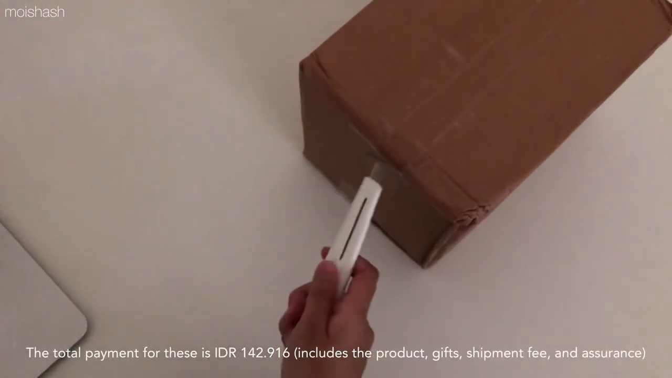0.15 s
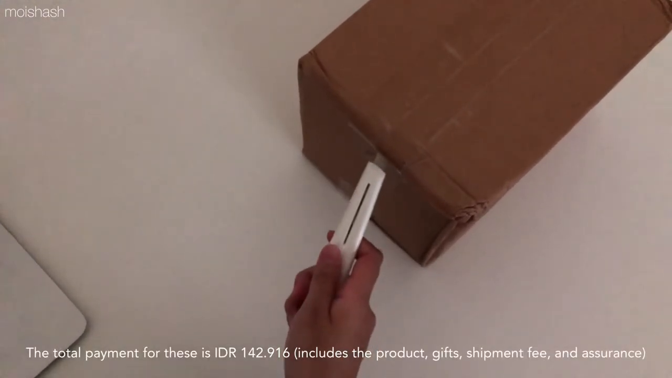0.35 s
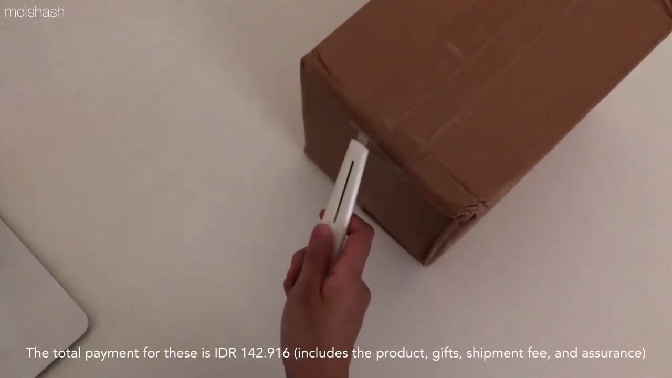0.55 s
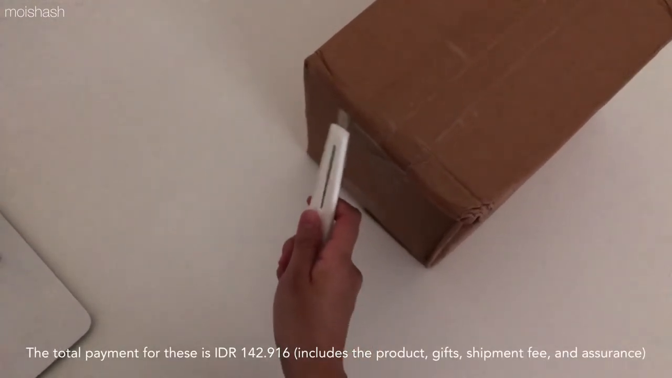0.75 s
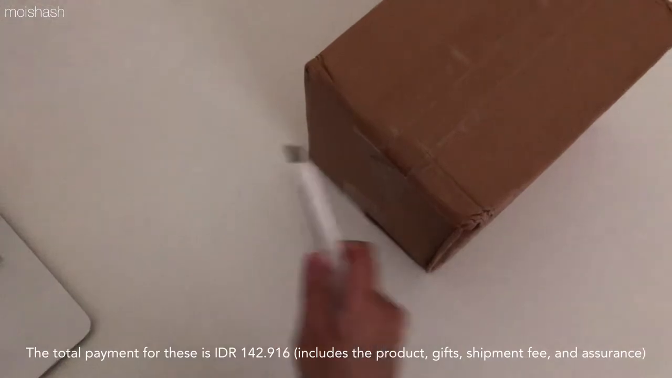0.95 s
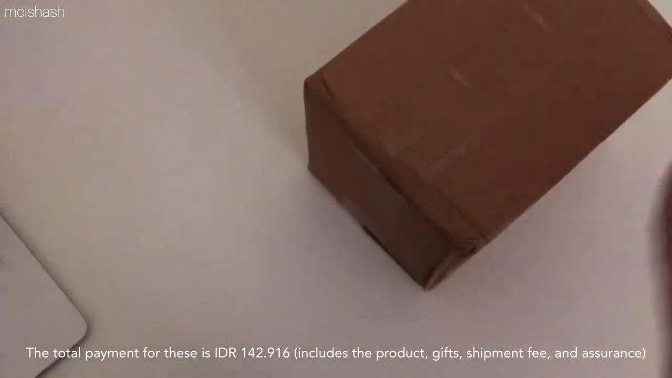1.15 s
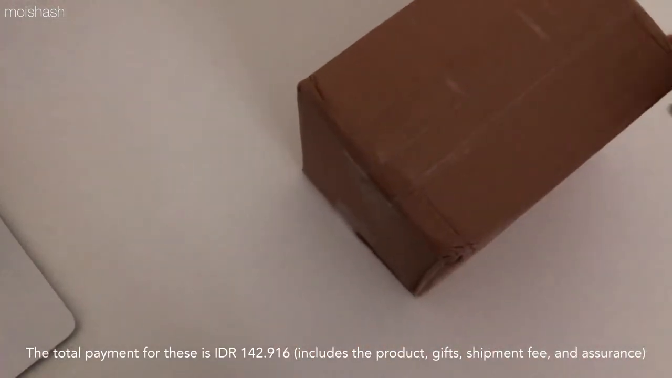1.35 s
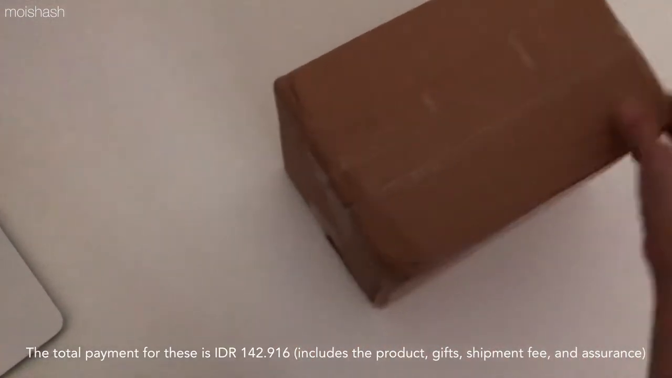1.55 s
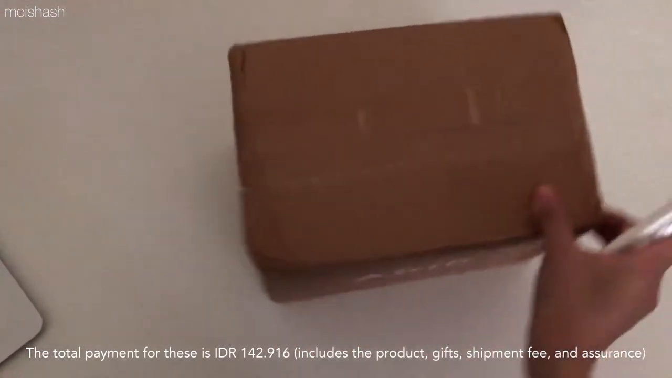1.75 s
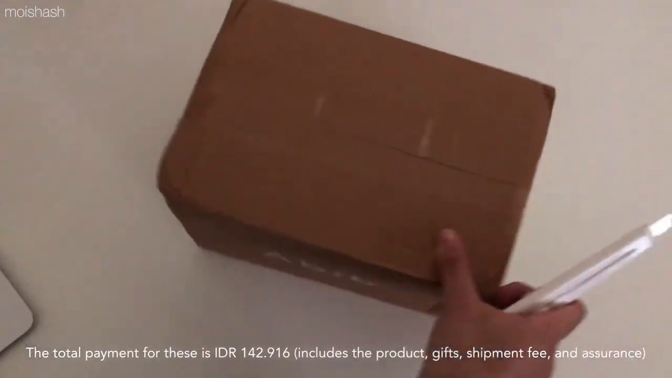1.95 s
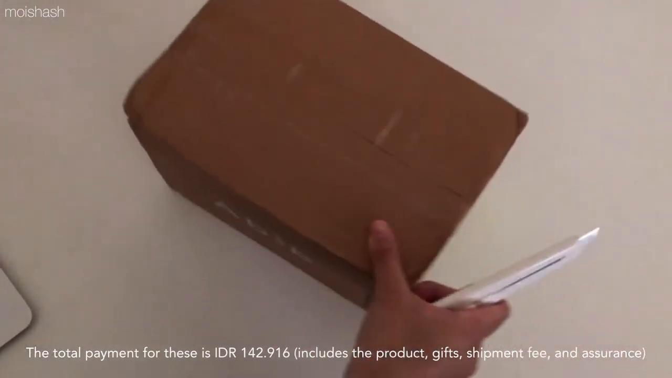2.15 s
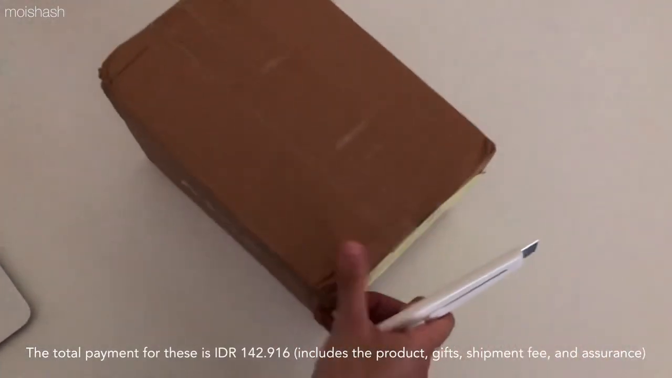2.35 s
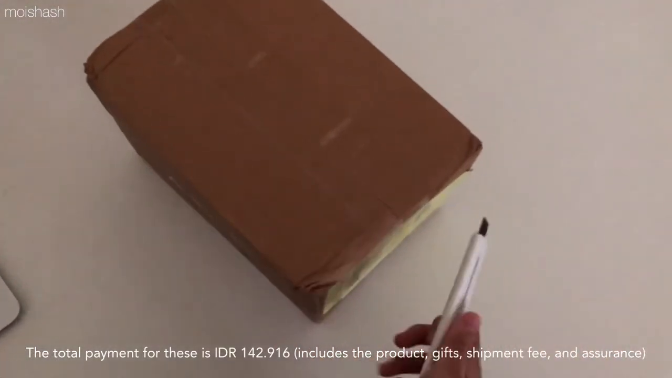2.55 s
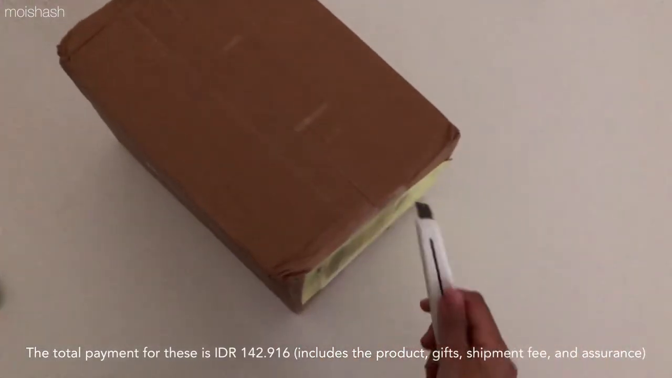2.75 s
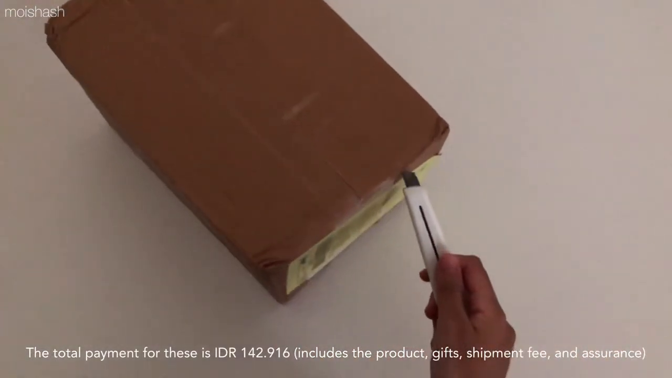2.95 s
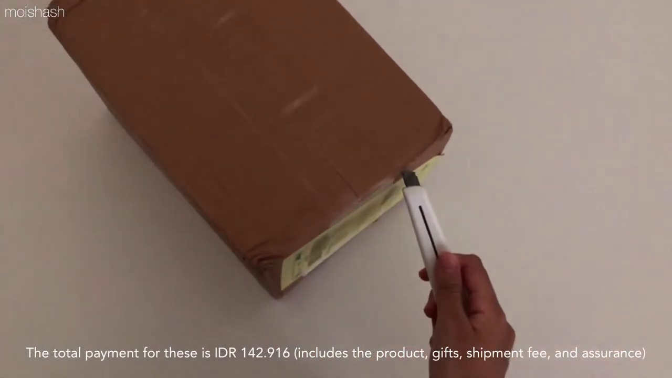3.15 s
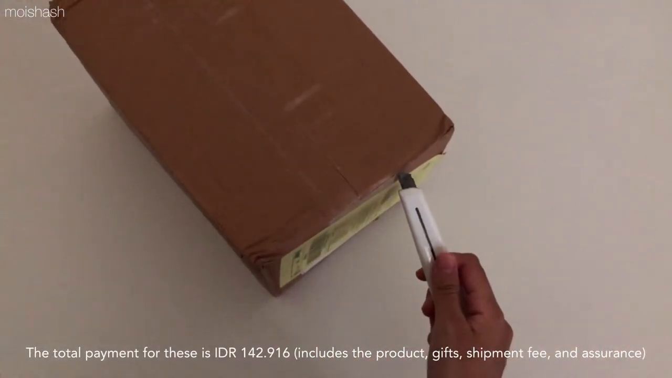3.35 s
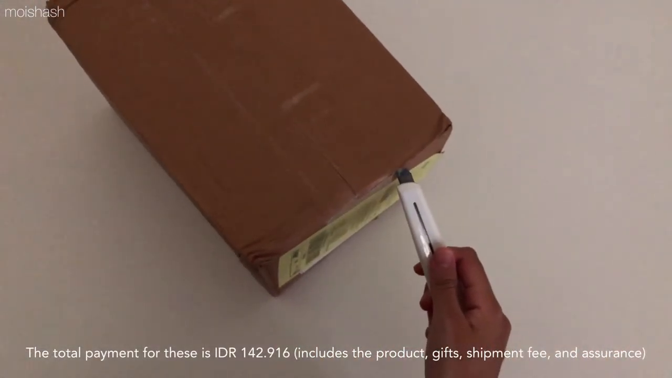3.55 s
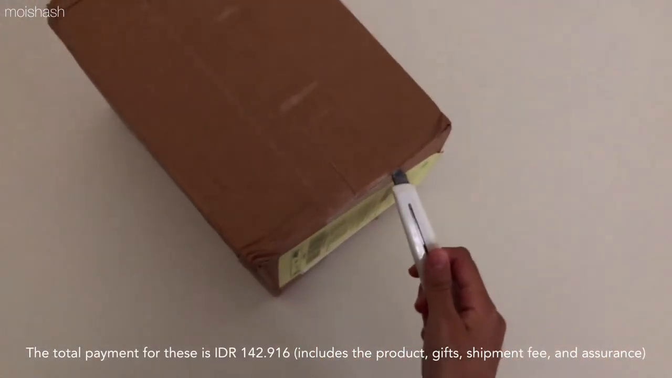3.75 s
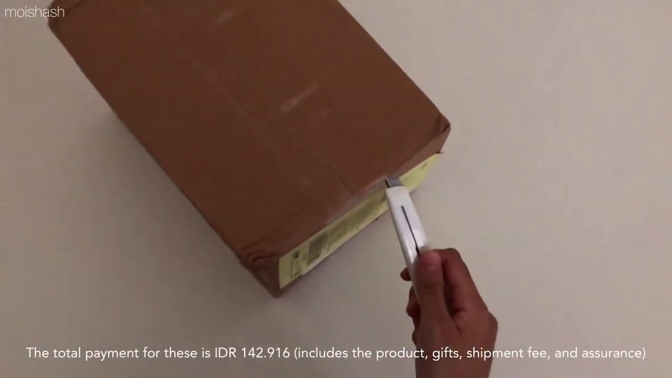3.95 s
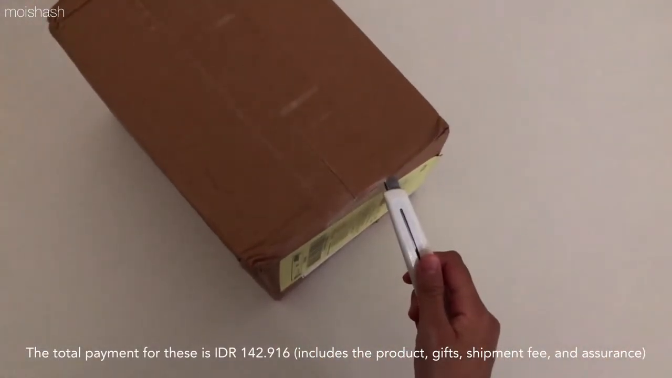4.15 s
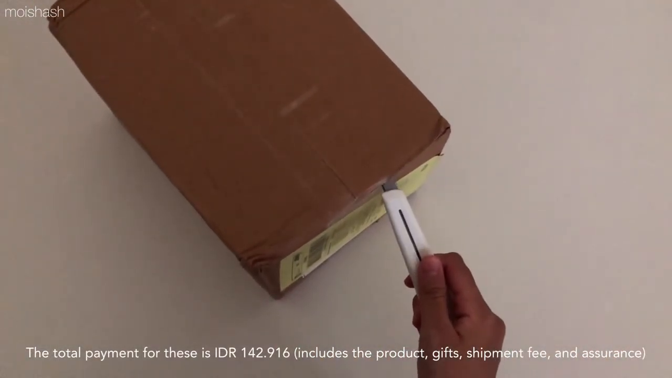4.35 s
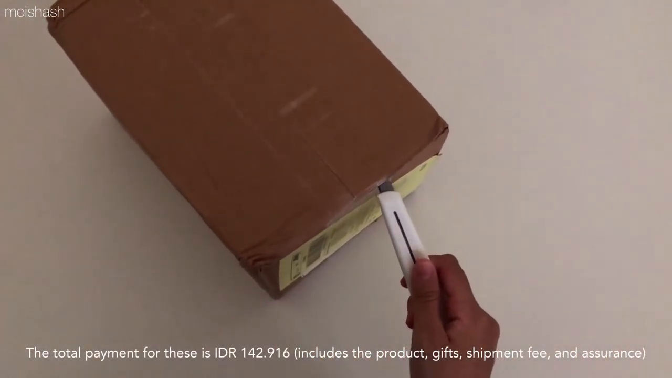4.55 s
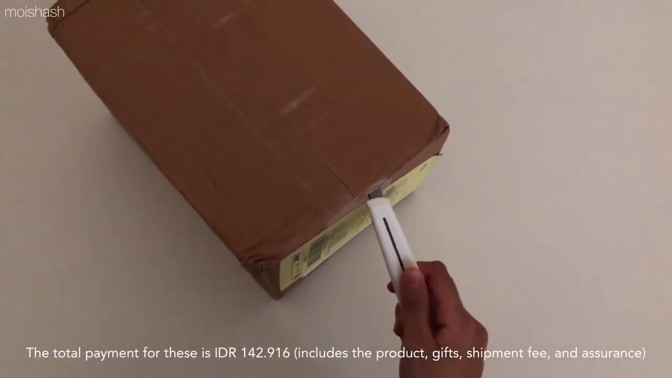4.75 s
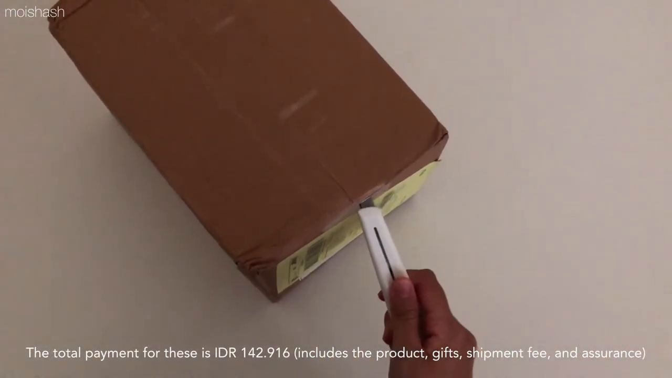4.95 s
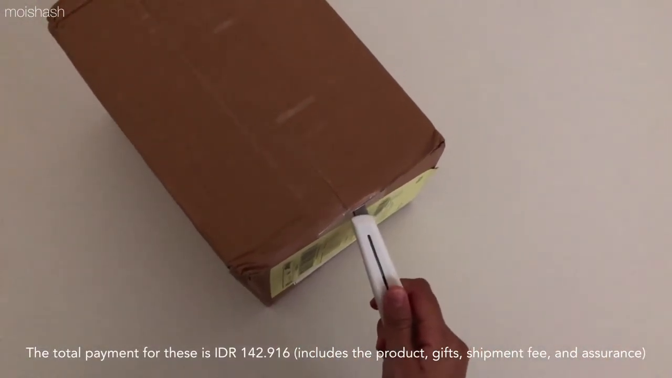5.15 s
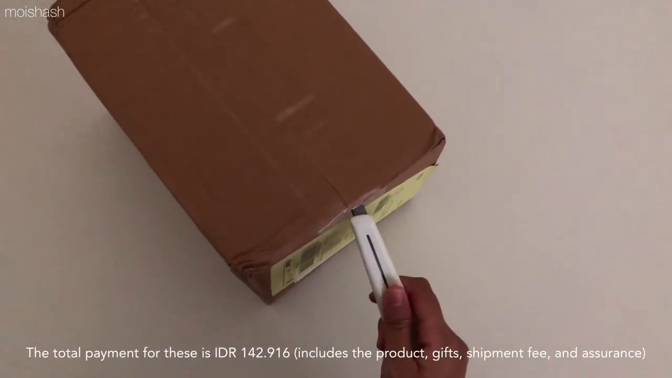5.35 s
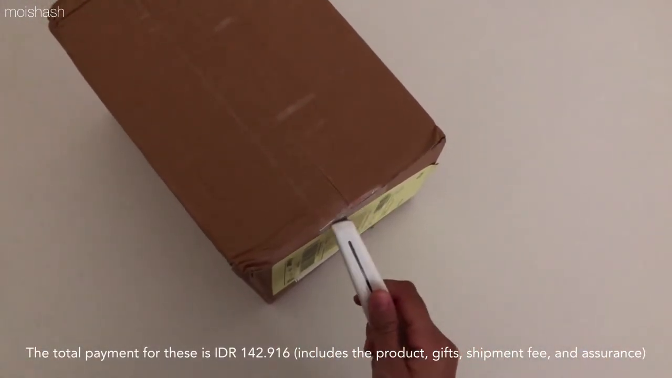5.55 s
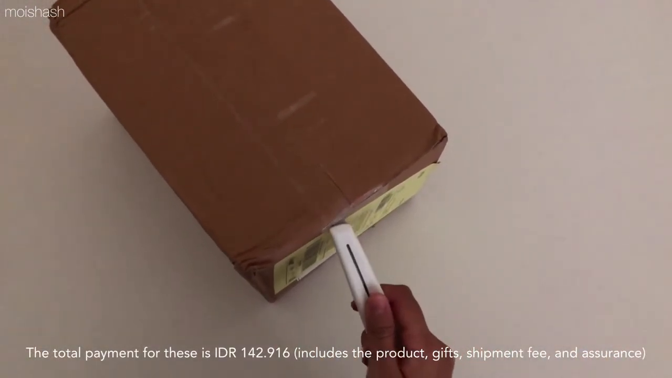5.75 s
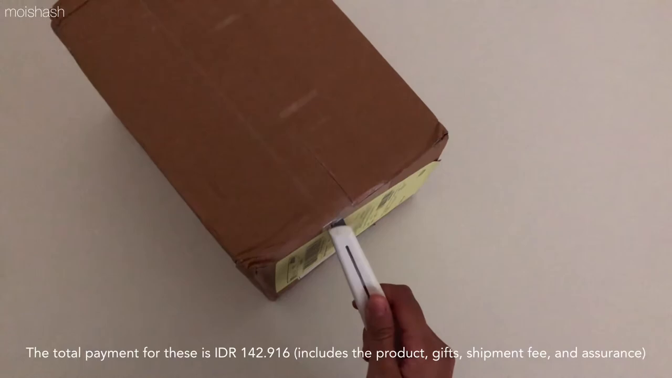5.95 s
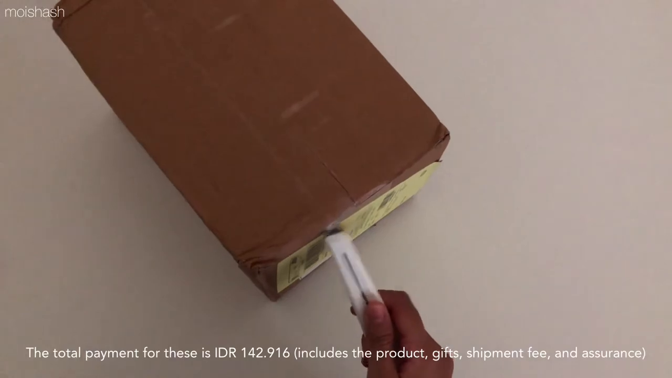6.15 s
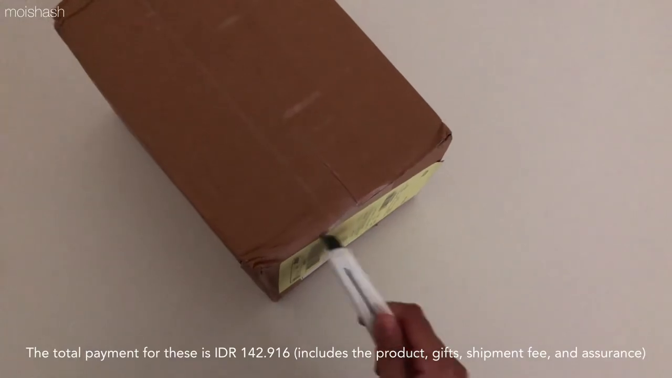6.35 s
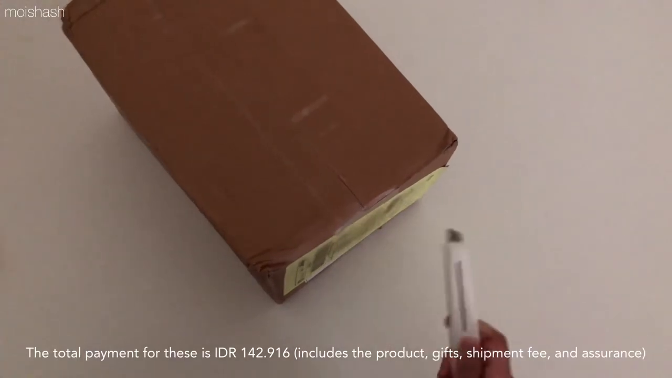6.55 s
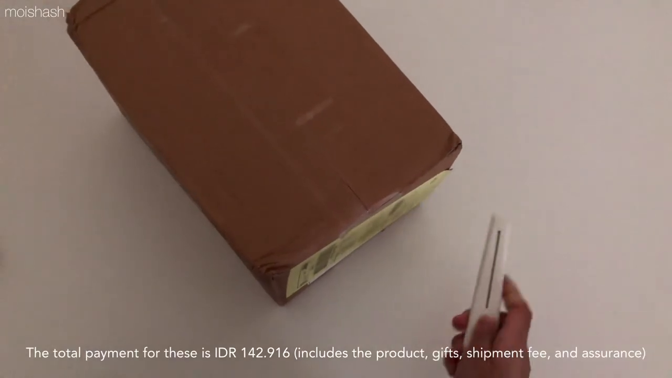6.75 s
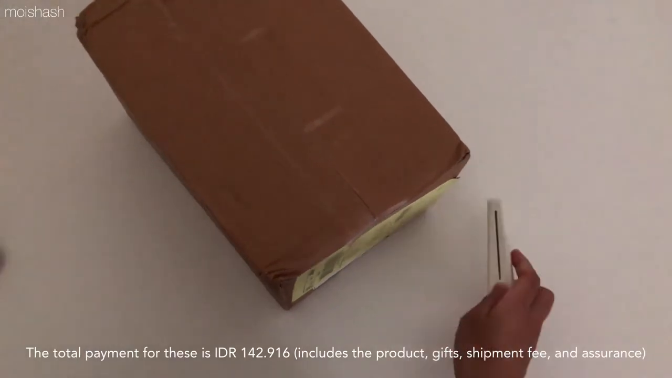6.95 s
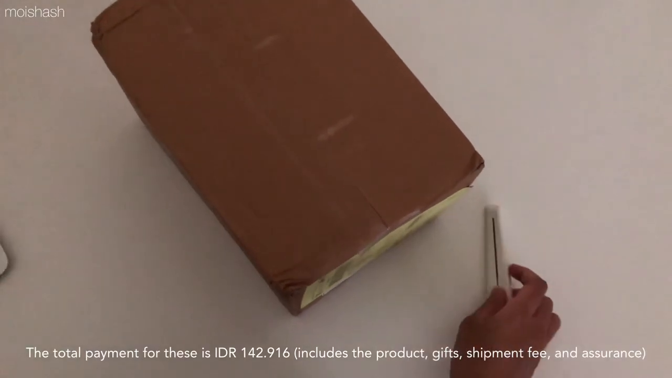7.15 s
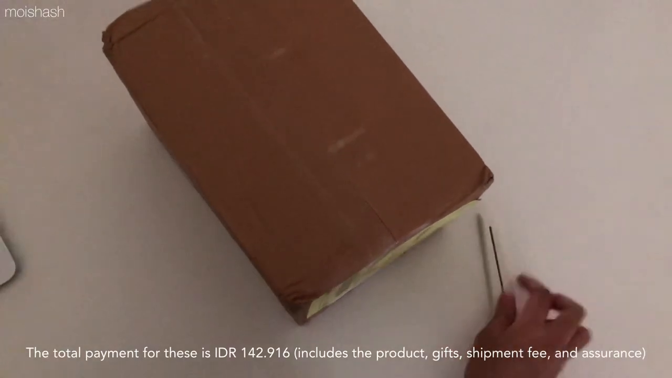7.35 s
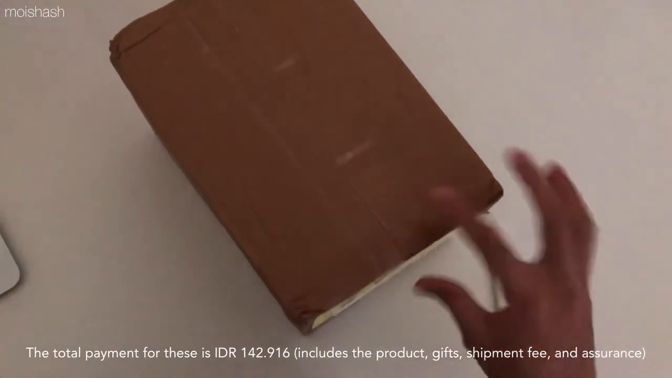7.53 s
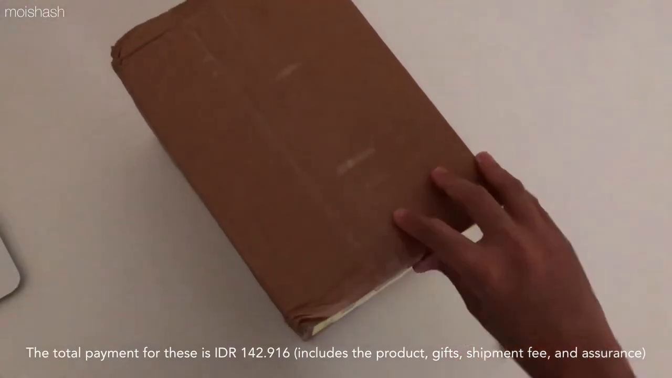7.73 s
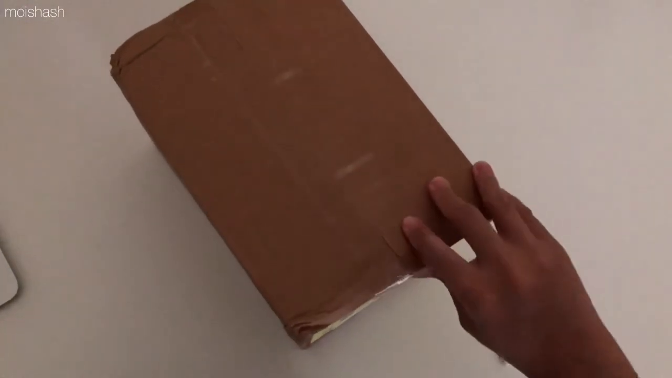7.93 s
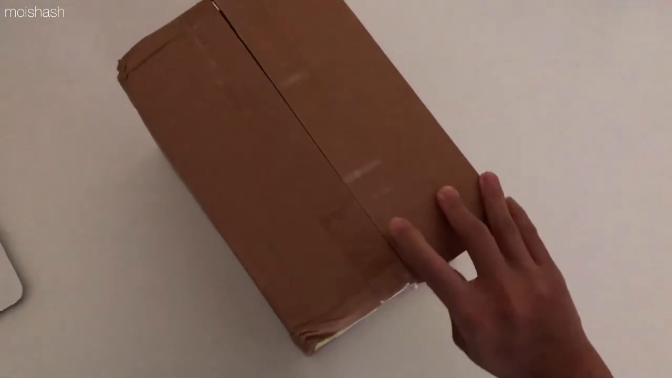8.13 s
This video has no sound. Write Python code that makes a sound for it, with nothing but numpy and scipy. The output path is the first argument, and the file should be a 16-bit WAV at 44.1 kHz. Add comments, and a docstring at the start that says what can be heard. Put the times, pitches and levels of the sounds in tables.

```python
"""A quiet room, with a cardboard box on a table close under a mono phone microphone. Ventilation drones
behind it all. A blade nicks and scrapes the packing tape: fibres snap and the box walls knock. The box is
dragged round with a hiss and a rumble. The cutter's slider ratchets back, ringing its plastic shell, and
the cutter is laid down, bouncing on the table top. Fingers then pick at the flaps."""
import sys
import numpy as np
from scipy import signal
from scipy.fft import rfft, irfft, next_fast_len
from scipy.io import wavfile
from scipy.ndimage import uniform_filter1d

SR = 44100
rng = np.random.default_rng(int(sys.argv[2]) if len(sys.argv) > 2 else 0)


def generate_wav(signal):
    """Clip the signal to [-1, 1] and save it as 16-bit WAV at the path in sys.argv[1]."""
    frames = np.transpose(np.atleast_2d(signal))
    scaled = np.clip(frames, -1, 1) * 32767
    pcm = np.round(scaled).astype(np.int16)
    wavfile.write(sys.argv[1], SR, pcm)


N = 365588

# A fade time is how long a sound takes to drop by 60 dB. A mode is one tone that an object rings with.
# rush of the ventilation air: (frequency [Hz], level [dB per Hz])
AIR_SPECTRUM = [(20, -39), (40, -10), (60, -1), (85, -8.5), (140, -11), (200, -3.5), (400, -8), (700, -12),
                (1200, -14.5), (2000, -19), (3000, -27), (6000, -34), (10000, -39.5), (16000, -42)]
# droning bands of the ventilation: (pitch [Hz], filter width [Hz], level [dB])
AIR_DRONES = [(113.1, 22.7, -60.5), (325.3, 64, -66), (401.8, 36, -65), (491.4, 44, -67), (601.6, 34, -69),
              (986, 107, -70), (1477, 190, -71), (1984, 170, -78)]
# the box and what is in it knocking: (time [s], peak [dB], pitch of the struck wall [Hz])
BOX_KNOCKS = [(.324, -44, 194), (.482, -40, 253), (1.293, -38, 281), (1.309, -41, 116), (1.472, -40.5, 660),
              (1.499, -46, 120), (1.602, -38, 596), (1.63, -40, 325), (1.67, -41.5, 400),
              (1.734, -41.5, 700), (1.778, -45, 800), (1.814, -35.5, 600), (1.85, -38.5, 900),
              (1.868, -30, 268), (1.92, -38, 563), (2.048, -43.5, 410), (2.147, -44, 358),
              (2.179, -41, 316), (2.242, -33.5, 179), (2.26, -40, 158), (5.281, -44.5, 676),
              (5.344, -41.5, 374), (5.363, -40, 375), (5.924, -46, 690), (6.065, -36.5, 439),
              (6.085, -33, 293), (6.099, -39, 307), (6.264, -40.5, 377), (7.674, -38.5, 1170),
              (7.946, -39.5, 536), (8.12, -41, 551)]
# modes of the cardboard walls: (pitch [Hz], level [dB], fade time [s])
BOX_MODES = [(111, -7, 0.074), (185, -8, 0.13), (267.6, -10.5, 0.1), (335.5, -2, 0.035), (411, -1.5, 0.026),
             (546, 0.5, 0.015), (675, 1.5, 0.018), (833, -1.5, 0.024), (1110, 2, 0.02), (1207, 3, 0.018),
             (1525, 2, 0.013), (1970, 0, 0.017)]
# tape fibres snapping under blade or finger: (time [s], peak [dB], centre frequency [Hz])
TAPE_SNAPS = [(0.3307, -52, 2740), (0.48, -50, 2770), (0.5375, -49.5, 5000), (0.829, -48.5, 4347),
              (.842, -46.5, 2550), (1.2472, -45, 4560), (2.472, -52, 6000), (3.2212, -41.5, 5470),
              (3.5518, -51, 5590), (3.7766, -45.5, 5730), (4.251, -55, 6000), (4.55, -54, 5650),
              (5.2834, -49, 2530), (5.314, -52, 4600), (5.334, -39, 8850), (5.345, -39, 3520),
              (5.3606, -38.5, 4530), (5.4136, -50, 2910), (5.912, -46.5, 6000), (6.025, -34.5, 8350),
              (6.0617, -32, 4330), (6.2605, -44.5, 2690), (6.29, -42.5, 5686), (6.939, -56, 13000),
              (7.5245, -48.5, 3330), (7.5685, -52, 2610), (7.6264, -56, 5700), (7.677, -43, 2680),
              (7.7483, -41.5, 5500), (7.7594, -44.5, 2520), (7.8176, -53, 7190), (7.8306, -46, 2440),
              (7.864, -45.5, 2630), (7.9538, -44.5, 9700), (8.1204, -41.5, 2679)]
# blade and fingers rubbing tape, and the box scraping just before it is dragged (the dull row at 1.18 s): (time
# [s], hold [s], level [dB], brightness [below 0 is duller])
TAPE_RUBS = [(.335, 0.027, -64, -2), (.402, 0.011, -63, -1), (.484, 0.037, -63.5, -2),
             (1.18, 0.15, -68, -9), (2.476, .008, -63, -6), (2.97, .15, -75, -6), (3.219, .004, -64, -8),
             (3.395, 0.024, -67, -4), (3.551, 0.014, -59, -6), (3.775, 0.0082, -59, -13),
             (4.248, .012, -62, -3), (4.471, 0.056, -71, -8), (4.55, 0.016, -62, 1),
             (4.812, 0.13, -55.5, 0), (5.08, 0.071, -77, -12), (5.342, 0.021, -49.5, 2),
             (5.415, 0.011, -68, -5), (5.625, 0.053, -64, -2), (5.685, 0.01, -68, 4), (5.88, 0.028, -80, 0),
             (5.914, 0.022, -57, 0), (6.067, 0.013, -43.5, 0.5), (6.219, 0.029, -60, -7),
             (6.53, 0.043, -71, 4.5), (6.71, .06, -73, 6), (7.145, 0.052, -52.5, 0), (7.4, .05, -72, -2),
             (7.628, 0.02, -59.5, -2), (7.81, 0.016, -62, -1), (7.86, 0.057, -66, -2),
             (7.946, 0.013, -59, 0), (8.08, 0.053, -72, 1), (8.16, 0.022, -68, 1)]
# hiss of rubbed tape: (frequency [Hz], level [dB per Hz])
RUB_SPECTRUM = [(1200, -13), (2400, -4), (3200, -4), (5700, 0), (9000, -3), (15000, -6), (16500, -9)]
# hiss of sliding cardboard: (frequency [Hz], level [dB per Hz])
DRAG_SPECTRUM = [(710, -17), (1200, -17), (1830, -13), (2040, -7.5), (3050, -9), (4700, -4.5), (7330, -6.5),
                 (15000, -8.5), (16000, -15.5)]
# slider teeth slipping and catching: (time [s], peak [dB], boost of the modes above 9 kHz [dB])
SLIDER_CLICKS = [(6.441, -29, -9), (6.444, -29, 3), (6.458, -53, 10), (6.4725, -29, -12), (6.476, -28, 4),
                 (6.4855, -31.5, -4), (6.5138, -27.5, 0), (6.529, -56, 3), (6.551, -43.5, 6),
                 (6.575, -38, 0), (6.5962, -25, -13.5)]
# modes of the cutter's plastic shell: (pitch [Hz], level [dB], fade time [s])
SHELL_MODES = [(2340, -14.5, 0.022), (3470, 1, 0.0029), (3950, -0.5, 0.0047), (5160, 5.5, 0.0034),
               (5790, -3, 0.014), (6260, 1, 0.0037), (8200, 0, 0.0015), (9840, -0.5, 0.0047),
               (11100, 0.5, 0.0031), (13120, 4.5, 0.0044), (14600, -3, .002), (15700, 4, 0.0022)]
# the cutter landing, bouncing and tipping flat:
# (time [s], crack peak [dB], shell peak [dB], table peak [dB], contact time [s])
CUTTER_LANDINGS = [(6.9615, -9, -11.5, -15, 0.000092), (6.9647, -30, -18, -28, 0.0003),
                   (6.987, -26, -26, -23.5, 0.00022), (7.1365, -44, -62, -26.5, 0.00047),
                   (7.141, -53, -60, -27, 0.0007), (7.1952, -18, -24, -13.5, 0.00038),
                   (7.2003, -23, -26.5, -24.5, 0.0007), (7.212, -36, -44, -27.5, 0.00046)]
# modes of the table top: (pitch [Hz], level [dB], fade time [s])
TABLE_MODES = [(114, -19.5, 0.15), (185, -8, 0.0087), (328, -6.5, 0.031), (395, -8.5, 0.017),
               (484, -3, 0.03424), (614.82, -3.5, 0.039), (648, -1.5, 0.027), (743, -4, 0.02),
               (1014, -0.5, 0.021), (1190, -2, 0.008), (1325, -1.5, 0.021), (1656, 1, 0.0093),
               (2000, -15, 0.0081), (2540, 2, 0.0053), (3150, -10, 0.0041), (3770, -5, 0.01)]
# bands of the room's echo: (centre frequency [Hz], fade time [s], level [dB])
ECHO_BANDS = [(235, 0.25, -18), (920, 0.37, -18), (2590, 0.43, -20), (6030, 0.34, -14.5), (11800, .18, -17)]


def undb(db):
    """Turn decibels into a gain to multiply by."""
    return np.exp(np.asarray(db) * np.log(10) / 20)


def unit(x):
    """Scale a sound to an average (rms) level of 1."""
    return x / np.sqrt(np.mean(x ** 2))


def band(x, hz, width_hz):
    """Keep the part of a sound that lies near one frequency."""
    return signal.lfilter(*signal.iirpeak(min(hz, SR / 2.3), hz / width_hz, fs=SR), x)


def shaped_noise(spectrum, tilt_db=0.):
    """Noise of level 1 that follows a spectrum, tilted by tilt_db per octave."""
    size = next_fast_len(N)
    octave = np.log2(np.arange(1, size // 2 + 2) * SR / size)
    hz, db = np.transpose(spectrum)
    gain = undb(np.interp(octave, np.log2(hz), db, left=-90) + tilt_db * octave)
    return unit(irfft(gain * rfft(rng.standard_normal(size)), size)[:N])


def wobble(rate_hz):
    """A smooth random curve that strays about 1 either side of zero."""
    hold = int(SR / rate_hz)
    steps = np.repeat(rng.standard_normal(N // hold + 1), hold)
    return unit(uniform_filter1d(uniform_filter1d(steps, hold), hold)[:N])


def ring(modes, scatter_db, lag=0., boost_db=np.zeros_like):
    """An object rings after a blow, never twice alike; with lag, bending waves bring the lows late."""
    hz, db, fade_s = np.transpose(modes)[:, :, None]
    level_luck, pitch_luck = rng.standard_normal((2,) + hz.shape)
    t = np.maximum(np.arange(int(SR * .06)) / SR - lag / np.sqrt(hz), 0)
    db = db + scatter_db * level_luck + boost_db(hz)
    tones = np.sin(2 * np.pi * hz * (1 + .02 * pitch_luck) * t)
    sign = (-1.) ** np.arange(len(hz))[:, None]  # neighbouring modes swing against each other
    return np.sum(sign * undb(db - 60 * t / fade_s) * tones, axis=0)


def burst(fade_s, rise_s):
    """A tiny rattle without pitch that rises quickly and fades."""
    t = np.arange(1024) / SR
    shape = undb(-60 * t / fade_s) * (1 - np.exp(-t / rise_s))
    rattle = rng.standard_normal(len(t)) * shape
    for _ in range(2):  # give every frequency an even share
        phases = np.angle(rfft(rattle * np.sqrt(shape)))
        rattle = np.sqrt(shape) * irfft(np.exp(1j * phases))
    return rattle


def push(contact_s):
    """The force of a contact: softer means longer and duller."""
    return np.hanning(int(contact_s * SR) + 3)


def stroke(start_s, stop_s, rise_s, fall_s):
    """Gain of one stroke: 20 dB up per rise_s, full from start to stop, 20 dB down per fall_s."""
    t = np.arange(N) / SR
    early, late = (start_s - t) / rise_s, (t - stop_s) / fall_s
    return undb(-20 * np.maximum(np.maximum(early, late), 0))


def add(track, at_s, sound, peak_db):
    """Lay a sound into the track with the given peak."""
    start = int(at_s * SR)
    sound = sound[:N - start]
    track[start:start + len(sound)] += undb(peak_db) * sound / np.max(np.abs(sound))


def ventilation(hum_hz=67, hum_grow_s=2.6):
    """Rushing air, drones that each waver on their own, and a low hum that drifts and slowly grows."""
    out = undb(-58 + .5 * wobble(1.92)) * shaped_noise(AIR_SPECTRUM)
    for hz, width_hz, db in AIR_DRONES:
        drone = band(band(rng.standard_normal(N), hz, width_hz), hz, width_hz)
        out += undb(db + wobble(4.7)) * unit(drone)
    hum = np.sqrt(2) * np.sin(2 * np.pi * np.cumsum(hum_hz + 1.606 * wobble(5.5)) / SR)
    hum_db = -60 - 11.5 * np.exp(-np.arange(N) / SR / hum_grow_s) + .73 * wobble(8.5)
    return out + undb(hum_db) * hum


def box_knocks(contact_cycles=.29):
    """A knock rings the modes near the struck wall's pitch; deep thuds have a longer, softer contact."""
    out = np.zeros(N)
    for at_s, peak_db, wall_hz in BOX_KNOCKS:
        walls = ring(BOX_MODES, scatter_db=2.3, lag=.028,
                     boost_db=lambda hz: np.where(hz > wall_hz, -5.5, 9) * np.log2(hz / wall_hz))
        add(out, at_s, np.convolve(push(contact_cycles / wall_hz), walls), peak_db)
    return out


def tape_snaps():
    """Fibres snap in short bursts, and the tight tape rings briefly at each one's centre frequency."""
    out = np.zeros(N)
    for at_s, peak_db, hz in TAPE_SNAPS:
        width_hz = np.clip(1.6 * hz, 300, 14000)
        snap = burst(fade_s=.031, rise_s=.0005)
        body = band(band(snap, hz, width_hz), hz, width_hz)
        ringing = 2.5 * band(snap, hz, .09 * hz)
        fizz = .15 * band(snap, 12500, 8000)
        add(out, at_s, body + ringing + fizz, peak_db)
    return out


def tape_rubs(blade_hz=6200, width_hz=590, nick_s=.028, blade_out_s=6.3):
    """Rubbing makes a gritty hiss; short nicks also make the blade sing until it is out of the tape."""
    dull, sharp = shaped_noise(RUB_SPECTRUM, -7.5), shaped_noise(RUB_SPECTRUM, 3.2)
    blade = undb(-8) * unit(band(band(rng.standard_normal(N), blade_hz, width_hz), blade_hz, width_hz))
    out = np.zeros(N)
    for at_s, hold_s, db, brightness in TAPE_RUBS:
        sharp_share = 1 / (1 + undb(-3 * brightness))
        hiss = (1 - sharp_share) * dull + sharp_share * sharp
        sing = np.exp(-hold_s / nick_s) * (at_s < blade_out_s)
        ease_s = .46 * hold_s  # longer rubs start and end more gently
        shape = stroke(at_s, at_s + hold_s, rise_s=.0078 + ease_s, fall_s=.016 + ease_s)
        out += undb(db) * shape * (hiss + sing * blade)
    return undb(1.2 * wobble(150)) * out


def box_drag(start_s=1.339, fastest_s=1.72, stop_s=2.25):
    """Sliding cardboard hisses while uneven slips shake the box walls; speed makes both louder."""
    speed = np.sin(np.pi / 2 * np.interp(np.arange(N) / SR, [start_s, fastest_s, stop_s], [0, 1, 0]))
    by_speed = lambda slow, fast: slow + (fast - slow) * speed
    dull, sharp = shaped_noise(DRAG_SPECTRUM, -2), shaped_noise(DRAG_SPECTRUM, 3.9)
    sharp_share = by_speed(.12, .83)
    hiss = np.sqrt(1 - sharp_share) * dull + np.sqrt(sharp_share) * sharp
    slips = rng.standard_normal(N) * undb(1.9 * rng.exponential(size=N) + 2.3 * wobble(40.6))
    walls = ring(BOX_MODES, scatter_db=0, boost_db=lambda hz: -6 * np.abs(np.log2(hz / 330)))
    rumble = unit(signal.oaconvolve(slips, walls)[:N])
    sliding = undb(by_speed(-53, -51) + .55 * wobble(40)) * hiss + undb(by_speed(-71.5, -54)) * rumble
    return stroke(start_s, stop_s, rise_s=.03, fall_s=.072) * sliding


def slider_ratchet():
    """The slider's teeth slip and catch, and each click rings the cutter's plastic shell."""
    out = np.zeros(N)
    for at_s, peak_db, treble_db in SLIDER_CLICKS:
        shell = ring(SHELL_MODES, scatter_db=1, boost_db=lambda hz: treble_db * (hz > 9000))
        click = signal.fftconvolve(burst(fade_s=.02, rise_s=.00061), shell)
        add(out, at_s - .0008, click, peak_db)
    return out


def cutter_landing():
    """Each time the cutter hits the table there is a crack, and both shell and table top ring."""
    out = np.zeros(N)
    for at_s, crack_db, shell_db, table_db, contact_s in CUTTER_LANDINGS:
        crack = band(burst(fade_s=.023, rise_s=.00022), 4450, 10300)
        add(out, at_s, crack, crack_db)
        shell = ring(SHELL_MODES, scatter_db=1, boost_db=lambda hz: 3.5 * (hz > 9000))
        add(out, at_s, signal.fftconvolve(burst(fade_s=.015, rise_s=.00038), shell), shell_db)
        table = ring(TABLE_MODES, scatter_db=.75, lag=.0577)
        add(out, at_s, np.convolve(push(contact_s), table), table_db)
    return out


def room_echo(sound, build_s=.0046):
    """Reflections build into a soft echo that dies fastest in the high treble."""
    t = np.arange(int(SR * .45)) / SR
    build = 1 - np.exp(-(t / build_s) ** 2)
    echo = 0
    for hz, fade_s, db in ECHO_BANDS:
        tail = band(rng.standard_normal(len(t)), hz, 1.9 * hz) * undb(-60 * t / fade_s) * build
        echo = echo + undb(db) * tail / np.sqrt(np.sum(tail ** 2))
    return signal.oaconvolve(sound, echo)[:N]


def scene():
    """The close sounds, their echo and the ventilation, alike in both channels."""
    near = box_knocks() + tape_snaps() + tape_rubs() + box_drag() + slider_ratchet() + cutter_landing()
    return np.tile(near + room_echo(near) + ventilation(), (2, 1))


def record(dry, low_hz=48, top_hz=15850):
    """The phone cuts the deepest bass and the highest treble."""
    dry = signal.sosfilt(signal.butter(3, low_hz, "high", fs=SR, output="sos"), dry)
    return signal.sosfilt(signal.ellip(10, .2, 70, top_hz, fs=SR, output="sos"), dry)


dry = scene()
out = record(dry)
generate_wav(out)
```